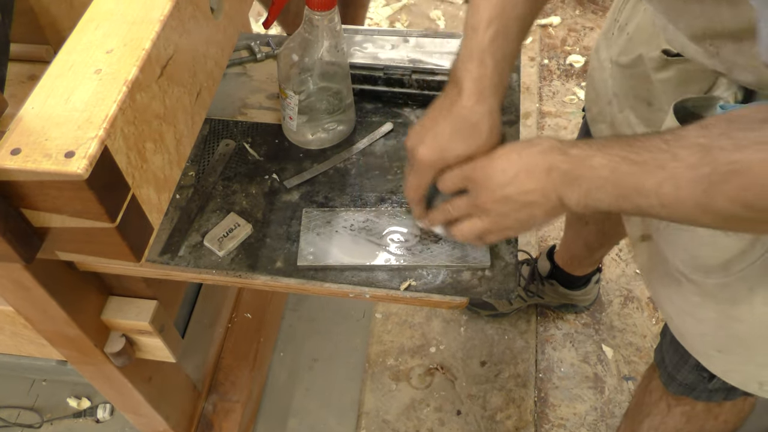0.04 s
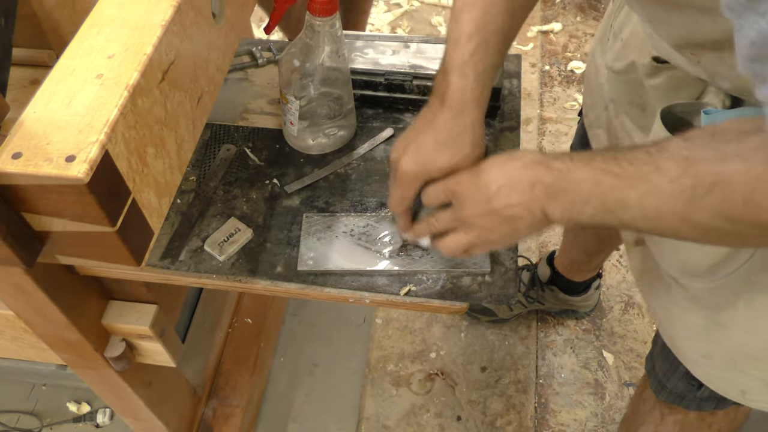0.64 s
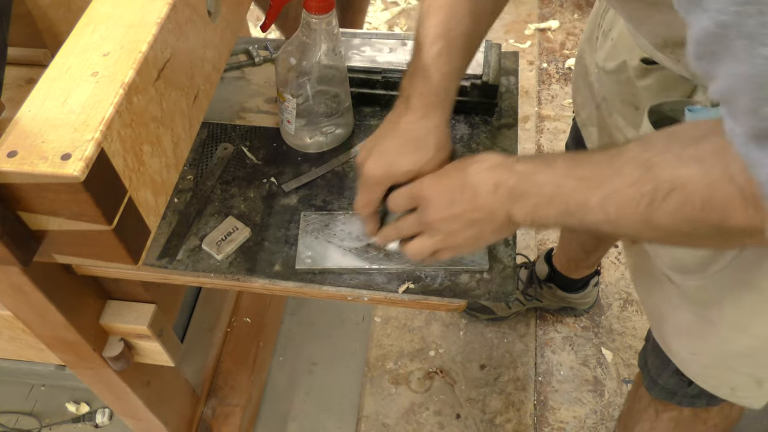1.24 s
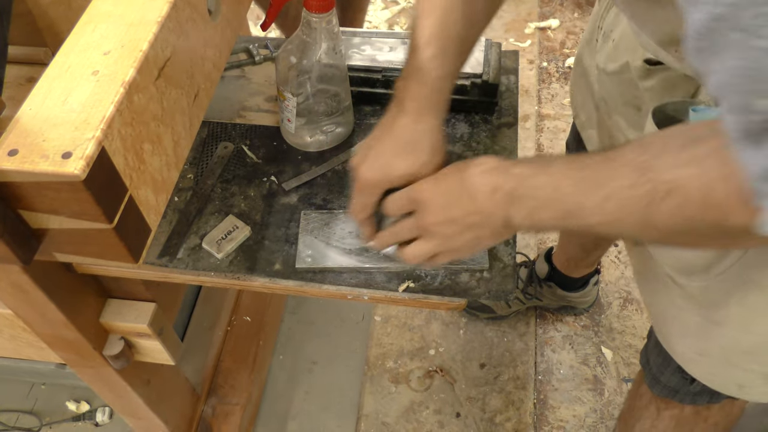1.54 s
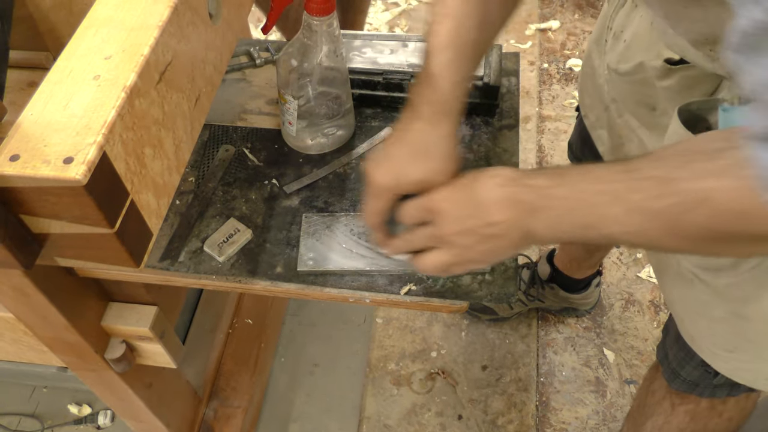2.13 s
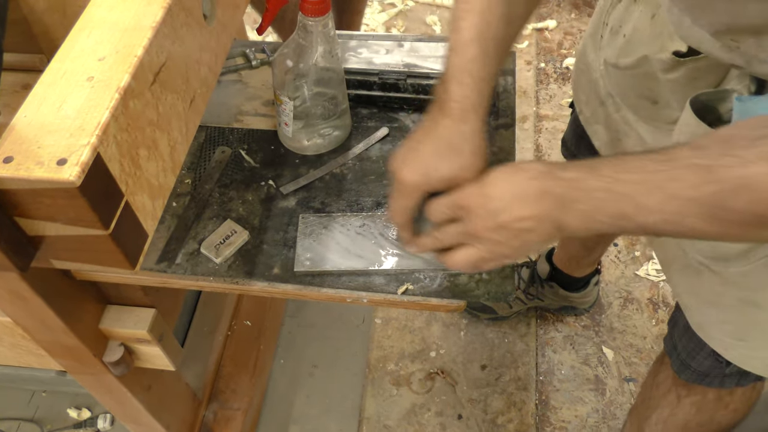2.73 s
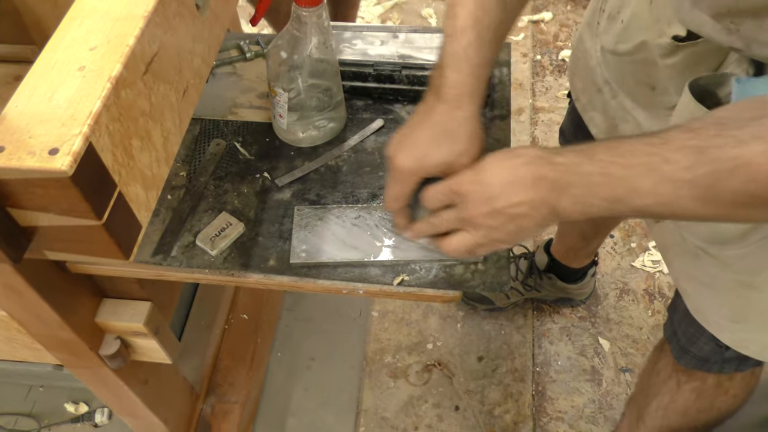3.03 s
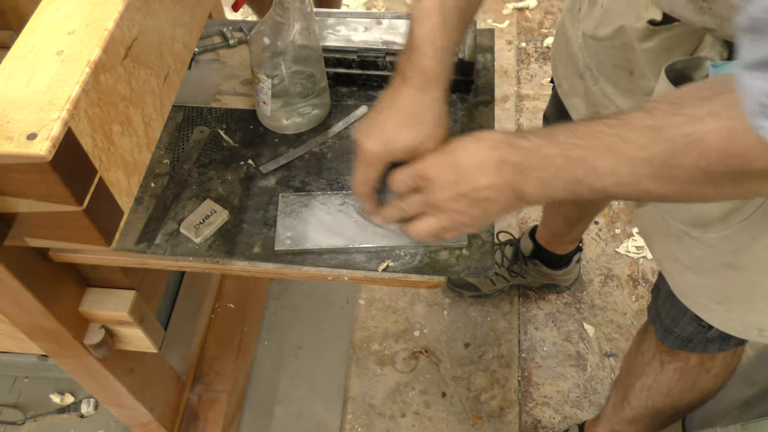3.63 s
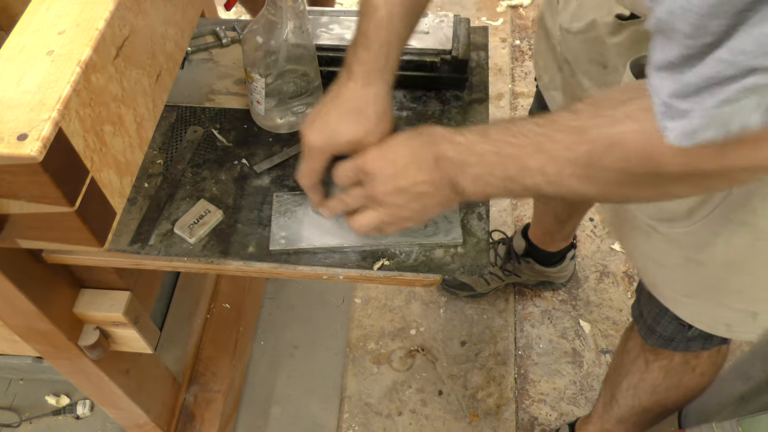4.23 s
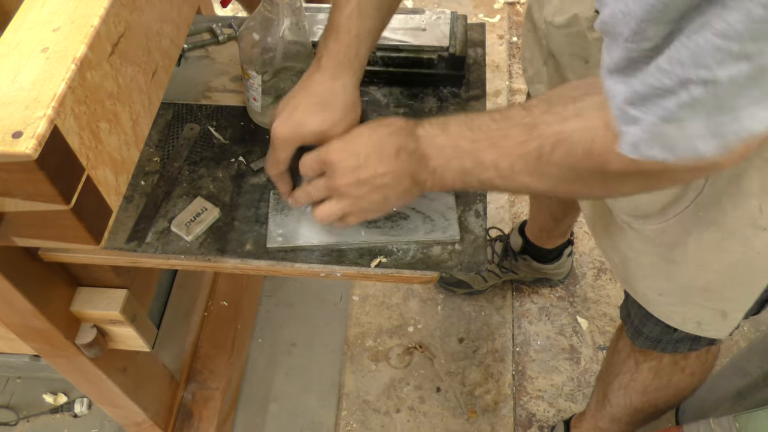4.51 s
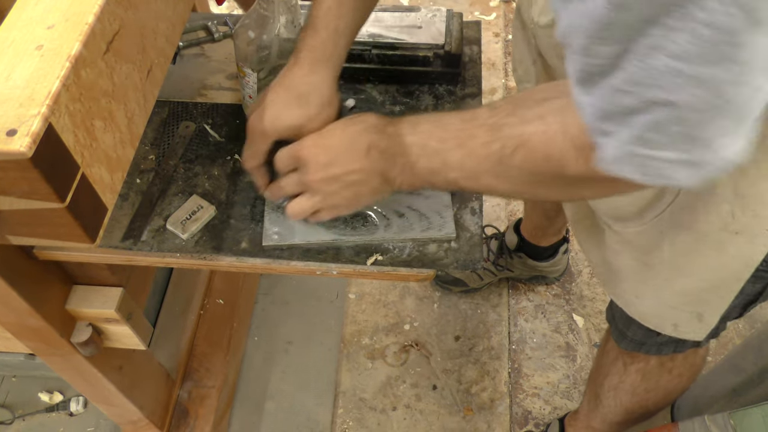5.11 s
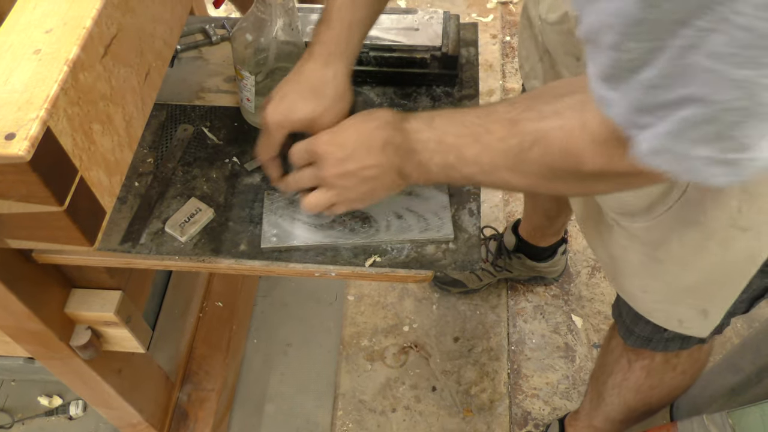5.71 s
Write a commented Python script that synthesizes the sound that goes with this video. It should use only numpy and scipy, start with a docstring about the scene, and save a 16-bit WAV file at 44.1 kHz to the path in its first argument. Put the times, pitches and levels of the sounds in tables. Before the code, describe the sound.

Close, steady scraping of steel on a wet sharpening stone pulses at roughly three strokes a second in a dry-sounding workshop. The edge catches on each pass with a tiny high squeal and ring, while wet grit swishes softly at the turns. Around the middle the steel lies flat and rasps with a slight chatter before the sharper strokes resume. Now and then it knocks lightly on the stone.

```python
"""A workshop: a steel plane part is rubbed in quick loops on a wet, coarse sharpening stone on a low bench.
Grit scratches under the steel, three loops a second; once a loop the edge bites, squeals and rings.
Midway the part lies flat and rasps. Slurry swishes at each turn, the grains rumble through the bench,
and now and then the part rocks and knocks on the stone."""
import sys
import numpy as np
from scipy import signal
from scipy.fft import rfft, irfft, next_fast_len
from scipy.io import wavfile
from scipy.ndimage import uniform_filter1d

SR = 44100
rng = np.random.default_rng(int(sys.argv[2]) if len(sys.argv) > 2 else 0)


def pcm_store(signal):
    """Save signal as 16-bit PCM."""
    levels = np.round(np.clip(np.atleast_2d(signal), -1, 1) * 32767)
    wavfile.write(sys.argv[1], SR, levels.astype(np.int16).T)


N = 262836

# grit spectra: freq_hz, gain_db
FINE_SPECTRUM = [(2500, -28.5), (4600, -6.5), (5600, -16), (6300, 6), (6850, 1.5), (7300, 3.5),
                 (7650, -0.5), (8050, -1.5), (8500, -6), (9700, -8.5), (10500, -14), (11700, -18),
                 (13700, -21), (14800, -36)]
COARSE_SPECTRUM = [(2500, -24.5), (3400, -10.5), (4200, -2), (4650, -6.5), (5200, 3.5), (5550, 2),
                   (6000, 4.5), (6400, -7), (6900, -22), (9000, -16), (11500, -35), (13000, -21),
                   (14000, -34), (14800, -56)]
RASP_SPECTRUM = [(1500, -60), (2500, -6.5), (2800, 0.5), (3350, 6.5), (3800, 7), (4500, -12.5), (5800, 0.5),
                 (6800, -46), (10000, -15), (14000, -42)]

def scratching():
    """Faster strokes meet more grains and sound brighter; the flat face adds a lower rasp."""
    fine_db, coarse_db, rasp_db = grit_drive_db()
    effort_db = fine_db - fine_db.mean()
    fine = grit(per_s=20000 * from_db(0.5 * effort_db), size_db=-0.5, judder_db=2.03, judder_hz=190)
    hiss = grit(per_s=12000, size_db=10, judder_db=-1, judder_hz=40)
    coarse = grit(per_s=12000, size_db=-0.5, judder_db=1.2, judder_hz=100)
    rasp = grit(per_s=9000, size_db=1.5, judder_db=1.9, judder_hz=17)
    hiss = signal.sosfilt(signal.butter(2, 10500, "high", fs=SR, output="sos"), hiss)
    hiss = signal.sosfilt(signal.butter(10, 13800, fs=SR, output="sos"), hiss)
    scrape = from_db(fine_db + 2) * rms_one(colour(fine, FINE_SPECTRUM))
    scrape += from_db(coarse_db + 1) * rms_one(colour(coarse, COARSE_SPECTRUM))
    scrape += from_db(rasp_db + 0.27) * rms_one(colour(rasp, RASP_SPECTRUM))
    scrape += from_db(fine_db - 21 + 0.68 * effort_db) * hiss
    return scrape * from_db(-1.8 * in_loop(share=0, spread=0.037))  # the steel slows as it swings round


def grit(per_s, size_db, judder_db, judder_hz):
    """Grains break under the steel in clumps of uneven clicks; force as (mid, side), rms 1."""
    hits = rng.random(N) < per_s / SR
    sizes = from_db(size_db * np.minimum(rng.exponential(1, N), 3.5))
    clumps = from_db(judder_db * np.clip(drift(judder_hz), -2, 2))
    return rms_one(hits * sizes * clumps * rng.standard_normal((2, N)) / np.sqrt(per_s))


def grit_drive_db():
    """Fine grit follows speed, coarse grit the push; lying flat evens the loop and drags on release."""
    flat, speed = flatness(), hand_speed()
    catch = in_loop(share=0.17, spread=0.058)
    push = in_loop(share=PUSH_SHARE, spread=0.12)
    release = in_loop(share=0.762, spread=0.092)
    contact_db = pressure_db() + (0.9 + 3.5 * flat) * catch + flat * (2.2 - 5.5 * speed)
    fine_db = -37 + contact_db + 8 * speed + release
    coarse_db = -34.5 + contact_db + 4 * speed + 4 * push + 6 * flat * release
    rasp_db = -38 + 2 * in_loop(share=0.21, spread=0.22) + flat * (3 + 4.5 * biting(spread_s=0.031))
    return fine_db, coarse_db, rasp_db


LAST_TURN_S, PUSH_SHARE, PULL_SHARE = 6.09, 0.31, 0.55
# hand loops, each a push then a pull: turn_s, push_db, pull_db, swish_gain_db, bench_load_db
HAND_LOOPS = [(-0.11, -0.5, -0.5, -40.0, 2), (0.2, 0, 1.5, -43, -1.0), (0.513, -0.5, -0.5, -41.5, 0.5),
              (0.83, -0.5, -0.5, -40.0, 0.0), (1.141, 0, -0.0, -39.0, 0), (1.45, -1, 1.5, -39, 0.5),
              (1.75, -0.5, 0.5, -39.0, -1.5), (2.061, 1, 0.0, -41.5, -0.5), (2.38, 2.0, 1, -42.5, 0),
              (2.677, -0.5, 0.5, -41.5, -0.5), (2.991, -0.5, 2.5, -47, 0.0), (3.281, -2, 3, -40.5, 1.0),
              (3.591, -0.5, 1.5, -46, -2), (3.909, 0.5, 1, -42, 0), (4.228, 0.5, 0, -39.5, 1.5),
              (4.539, 1.0, -0.5, -39.0, 2.5), (4.85, -1.5, 1, -41, -2), (5.17, -0.5, 1.5, -39.5, -1),
              (5.471, -2, 1.5, -44.0, -0.5), (5.779, -0.5, 2.0, -42, 0.5)]

def loop_count():
    """Loops completed; a whole number at each turn."""
    turns_s = [row[0] for row in HAND_LOOPS] + [LAST_TURN_S]
    return np.interp(np.arange(N) / SR, turns_s, np.arange(len(turns_s)))


def pressure_db():
    """Weight on the steel, passing from push to pull and on to the next push."""
    push_pull_db = np.array(HAND_LOOPS)[:, 1:3]
    places = np.arange(len(HAND_LOOPS))[:, None] + [PUSH_SHARE, PULL_SHARE]
    return np.interp(loop_count(), places.ravel(), push_pull_db.ravel())


def hand_speed():
    """0 at the turns, 1 halfway round."""
    return np.sin(np.pi * (loop_count() % 1))


# lie of the part: time_s, flatness (0 on its edge, 1 on its face)
LIE = [(0, 0.46), (.5, 0.36), (1.0, 0), (2.1, 0.09), (2.5, 0.74), (2.9, 0.94), (3.45, 1.0), (3.8, 0.65),
       (4.1, 0.69), (4.5, 0), (5.6, 0), (5.96, 0.051)]

def flatness():
    """How flat the part lies on the stone."""
    return in_time(LIE)[0]


# edge bites, as push gives way to pull: centre_s, length_s, squeal_db, ring_gain_db
EDGE_BITES = [(0.077, 0.074, -28, -31), (0.399, .05, -23.5, -29.5), (.699, .05, -28, -29),
              (1.017, .07, -24.5, -31), (1.324, .08, -22.5, -30), (1.634, 0.13, -25.5, -30.5),
              (1.946, .055, -20.5, -25.5), (2.255, 0.12, -24, -25.5), (2.567, .07, -29, -31.5),
              (2.873, .07, -45, -44), (3.178, .07, -44, -45), (3.488, 0.067, -37, -27),
              (3.79, .07, -34, -26.5), (4.111, 0.051, -26.5, -38), (4.42, 0.09, -26.5, -31),
              (4.725, .07, -31, -32.5), (5.037, 0.1, -26.5, -35), (5.34, 0.051, -24, -32),
              (5.658, .07, -30, -28.5), (5.95, .06, -28.5, -29)]
# chatter of the face: centre_s, length_s, pitch_hz, level_db, glide_hz_per_s
CHATTER = [(2.039, 0.13, 5850, -31, -2000), (2.879, 0.1, 3270, -31.5, 3500), (2.89, 0.085, 5960, -34, 0),
           (2.98, 0.13, 5720, -30, 0), (3.073, 0.089, 3910, -34, 0), (3.167, 0.12, 3227, -30, 4000),
           (3.285, 0.06, 5780, -30, 0), (3.434, 0.086, 3900, -28, 0), (3.515, 0.11, 5860, -29, 0),
           (3.838, 0.053, 6230, -27, 0), (3.865, 0.051, 5930, -37, 0), (4.945, 0.21, 3450, -38, 0),
           (5.274, 0.057, 3450, -36, 0)]

def squeals(bite_hz, bite_glide_hz_per_s, width_hz, judder_db):
    """Stick and slip of the steel: brief, rough tones that swell and die."""
    out, time_s = np.zeros((2, N)), np.arange(N) / SR
    # the swing builds and collapses at random; the grip holds its mean strength
    swing = np.array([drift(width_hz) + 1j * drift(width_hz) for _ in range(2)])
    swing *= from_db(judder_db * drift(150))
    swing /= np.sqrt(uniform_filter1d(np.abs(swing) ** 2, size=1100) / 2 + 1e-6)
    bites = [(s, length_s, bite_hz, db, bite_glide_hz_per_s) for s, length_s, db, _ in EDGE_BITES]
    for centre_s, length_s, pitch_hz, level_db, glide_hz_per_s in bites + CHATTER:
        span = np.flatnonzero(np.abs(time_s - centre_s) < length_s / 2)
        t = time_s[span] - centre_s
        tone = np.exp(2j * np.pi * (pitch_hz * t + glide_hz_per_s * t ** 2 / 2))
        out[:, span] += from_db(level_db) * np.cos(np.pi * t / length_s) * (swing[:, span] * tone).real
    return out


def biting(spread_s, lead_s=0):
    """A swell round each bite of the edge."""
    time_s = np.arange(N) / SR
    return sum(bell(time_s - row[0] + lead_s, spread_s) for row in EDGE_BITES)


# slow fade of the low steel mode: time_s, gain_db
LOW_MODE_FADE = [(0, .4), (2.6, 0.2), (4.4, -0.9), (5.96, -2)]

def steel_ring():
    """Two modes of the part; their pitch rises with stroke speed and sags when the flat face bites."""
    flat, speed = flatness(), hand_speed()
    bite = biting(spread_s=0.03, lead_s=-0.0054)
    fade_db, = in_time(LOW_MODE_FADE)
    low_db = -41.5 + fade_db + 2.5 * speed + 6.5 * bite
    low_db += 3 * in_loop(share=0.21, spread=0.11) - in_loop(share=0, spread=0.17) - 0.53
    low_hz = 1962 + 126 * speed - 98 * flat * bite
    low = steel_mode(low_db, low_hz, width_hz=145, wander=0.014, judder_db=3.5, judder_hz=14)
    _, _, ring_gain_db = in_time(EDGE_BITES)
    bitten = from_db(ring_gain_db) * biting(spread_s=0.022)
    rubbed = from_db(-47 + 8.5 * speed + 8.5 * flat * in_loop(share=0.34, spread=0.18))
    plate_db = 20 * np.log10(np.hypot(bitten, rubbed)) - 0.51
    stiffening_hz = 60 * (1 - flat) * bite
    plate_hz = 3870 * (low_hz / low_hz.mean()) ** 0.96 + stiffening_hz
    return low + steel_mode(plate_db, plate_hz, width_hz=165, wander=0.006, judder_db=2.5, judder_hz=52)


def steel_mode(level_db, pitch_hz, width_hz, wander, judder_db, judder_hz):
    """Grit drives a mode in fits; the shifting grip bends its pitch and friction holds its swing."""
    force = grit(per_s=12000, size_db=2, judder_db=judder_db, judder_hz=judder_hz)
    swing = resonate(force, pitch_hz * (1 + wander * drift(42)), width_hz)
    running_rms = np.sqrt(uniform_filter1d(swing[0] ** 2, size=1800) + 1e-6)
    return from_db(level_db) * swing / running_rms


# wet hiss: freq_hz, gain_db
SLURRY_SPECTRUM = [(300, -14), (650, -9.5), (1100, 0.5), (1350, 0), (1600, 9.5), (1850, 10.5), (2400, 0),
                   (4000, 4), (9000, -51)]

def slurry_swish(centre_hz, fall_octaves_per_loop, width_hz):
    """At each turn the steel squeezes wet grit aside: a hollow, falling swish over a thin hiss."""
    _, _, swish_gain_db, _ = in_time(HAND_LOOPS)
    swell = in_loop(share=0, spread=0.12)
    force = grit(per_s=3200, size_db=2, judder_db=1.6, judder_hz=17)
    octaves = -fall_octaves_per_loop * loop_offset(share=0) + 0.097 * drift(2.2)
    hollow = resonate(force, centre_hz * 2 ** octaves, width_hz)
    wet_grains = grit(per_s=4000, size_db=2, judder_db=3.5, judder_hz=22)
    hiss = rms_one(colour(wet_grains, SLURRY_SPECTRUM))
    return from_db(swish_gain_db - 0.8) * swell * hollow + from_db(-44.5 + 4.4 * swell) * hiss


# bench response: freq_hz, gain_db
BENCH_SPECTRUM = [(50, -34), (110, -32), (160, -5.5), (235, 8), (292, -3), (330, 1.5), (385, 2.5), (450, 5),
                  (560, -2.5), (690, 7), (830, -4), (920, 0), (1500, -6.5), (3000, -41)]

def bench_rumble():
    """Grains rumble through the stone into the bench, loaded at the turn, the push and before the bite."""
    load_db = np.interp(loop_count(), np.arange(len(HAND_LOOPS)) + 0.5, np.array(HAND_LOOPS)[:, 4])
    load_db += 6.5 * in_loop(share=0.02, spread=0.092)
    load_db += 6.5 * in_loop(share=0.36, spread=0.086)
    load_db += 10 * biting(spread_s=0.02, lead_s=0.011)
    force = grit(per_s=2200, size_db=0.8, judder_db=1.5, judder_hz=32)
    return from_db(-53 + 2.1 * flatness() + load_db) * rms_one(colour(force, BENCH_SPECTRUM))


# knocks on the stone: start_s, strength_db
ROCKINGS = [(1.866, -33), (2.146, -34), (2.465, -34), (2.773, -29.5), (3.677, -27.5), (4.402, -36),
            (4.63, -26)]
# modes of stone and bench: pitch_hz, gain_db, t60_s
STRUCK_MODES = [(242, -42, 0.046), (477, -2, .03), (726, -4.5, 0.074), (880, -12, 0.015), (1150, 3, 0.014),
                (1450, 6.5, 0.019), (2020, 8.5, 0.019)]

def knocks():
    """The part rocks onto the stone and strikes each mode with a strength of its own."""
    start_s, strength_db = np.transpose(ROCKINGS)
    starts = np.round(start_s * SR).astype(int)
    scatter_db = 0.7 * rng.standard_normal((len(starts), len(STRUCK_MODES)))
    mid = np.zeros(N)
    for k, (pitch_hz, gain_db, t60_s) in enumerate(STRUCK_MODES):
        clicks = np.zeros(N)
        clicks[starts] = from_db(strength_db + gain_db - 3 + scatter_db[:, k])
        mid += (-1) ** k * ring(clicks, pitch_hz, t60_s)
    return np.array([mid, np.zeros(N)])


def moving_echoes(x, echo_db, paths=7):
    """Hands, arms and bench reflect the treble along paths that move with each loop: its colour swirls."""
    t, loop_rad = np.arange(N) / SR, 2 * np.pi * loop_count()
    treble = colour(x, [(1500, -40), (2800, 0)])
    oversampled = signal.resample_poly(treble, 4, 1, axis=1)
    echoes = np.zeros((2, N))
    for channel in range(2):
        for path_s in np.linspace(0.0006, 0.0046, paths) + rng.uniform(-0.0002, 0.0002, paths):
            sway_s = 0.00011 * np.sin(loop_rad + rng.uniform(0, 2 * np.pi))
            lag_s = path_s + sway_s + 0.00014 * drift(0.7)
            read = np.clip(np.round((t - lag_s) * 4 * SR).astype(int), 0, 4 * N - 1)
            polarity = rng.choice([-1, 1])
            echoes[channel] += polarity * (t > lag_s) * oversampled[channel, read] / np.sqrt(paths)
    gain = from_db(echo_db)
    return x - treble + (treble + gain * echoes) / np.sqrt(1 + gain ** 2)


def workshop_reverb(x, t60_s, wet_db):
    """Walls and timber add a short, dense tail."""
    t = np.arange(SR // 2) / SR
    tail = rng.standard_normal((2, len(t))) * from_db(-60 * t / t60_s) * (t > 0.004)
    tail /= np.sqrt(np.sum(tail ** 2, axis=1, keepdims=True))
    return x + from_db(wet_db) * signal.fftconvolve(x, tail, axes=1)[:, :N]


# room tone: freq_hz, gain_db
AIR_SPECTRUM = [(15, 14.5), (35, -13), (75, -31), (130, -8), (500, -3), (4000, -18)]

def still_air(level_db):
    """Faint, steady noise of the workshop air."""
    return from_db(level_db) * rms_one(colour(rng.standard_normal((2, N)), AIR_SPECTRUM))


# stereo width: freq_hz, side_gain_db
SIDE_RESPONSE = [(30, -1), (70, -6), (150, -20), (900, -29.5), (1700, -29), (2200, -15), (4000, -12),
                 (6300, -13), (7700, -5), (9000, 0.5), (10800, 4), (13000, -0.5), (15000, -6)]
# stereo tilt: freq_hz, left_gain_db
LEFT_RESPONSE = [(60, 0.5), (120, 0), (500, -.5), (900, -0.6), (1700, 0), (2700, -0.2), (4200, 1.5),
                 (6400, .5), (10000, 0.85), (14000, 1.5)]

def microphone_pair(mid, side):
    """Mid and side to left and right; sound reaches the right port a fraction of a sample earlier."""
    side = colour(side, SIDE_RESPONSE) - 0.14 * np.gradient(mid)
    return np.array([colour(mid + side, LEFT_RESPONSE), mid - side])


def loop_offset(share):
    """Signed distance, in loops, from the nearest pass through a place in the loop."""
    return (loop_count() - share + 0.5) % 1 - 0.5


def in_loop(share, spread):
    """A swell at the same place in every loop; share 0 is the turn."""
    return bell(loop_offset(share), spread)


def bell(offset, spread):
    """A smooth swell, 1 at offset 0."""
    return np.exp(-0.5 * (offset / spread) ** 2)


def resonate(force, pitch_hz, width_hz):
    """A steep-skirted mode whose centre follows a pitch curve; rms 1."""
    carrier = np.exp(2j * np.pi * np.cumsum(pitch_hz) / SR)
    swing = force / carrier
    for stage_hz in (width_hz, 4 * width_hz):
        pole = np.exp(-np.pi * stage_hz / SR)
        swing = signal.lfilter([1 - pole], [1, -pole], swing)
    return rms_one((swing * carrier).real)


def ring(clicks, pitch_hz, t60_s):
    """A unit click starts a decaying sine of height 1."""
    pole, step_rad = from_db(-60 / (t60_s * SR)), 2 * np.pi * pitch_hz / SR
    feedback = [1, -2 * pole * np.cos(step_rad), pole * pole]
    return signal.lfilter([0, np.sin(step_rad)], feedback, clicks + 1e-18)


def drift(rate_hz):
    """Smooth random curve of rms 1, rolled off above rate_hz."""
    step, size = 16, 2 ** 15
    bins_hz = np.fft.rfftfreq(size, step / SR)
    spectrum = rfft(rng.standard_normal(size)) / (1 + (bins_hz / rate_hz) ** 2)
    return rms_one(np.interp(np.arange(N) / step, np.arange(size), irfft(spectrum)))


def colour(x, outline):
    """Filter by rows of freq_hz, gain_db."""
    size = next_fast_len(N + 4096)
    freq_hz, gain_db = np.transpose(outline)
    bins_hz = np.maximum(np.fft.rfftfreq(size, 1 / SR), 1)
    gain = from_db(np.interp(np.log(bins_hz), np.log(freq_hz), gain_db))
    return irfft(rfft(x, size) * gain, size)[..., :N]


def in_time(rows):
    """Each column after the leading time_s, at every sample."""
    time_s, *columns = np.transpose(rows)
    return [np.interp(np.arange(N) / SR, time_s, column) for column in columns]


def from_db(db):
    """Decibels to gain."""
    return np.exp(np.asarray(db) * (np.log(10) / 20))


def rms_one(x):
    """Scale to rms 1."""
    return x / np.sqrt(np.mean(x ** 2) + 1e-20)


def scene():
    """The rubbing in the room, at a close pair of microphones."""
    work = moving_echoes(scratching(), echo_db=-5)
    work += slurry_swish(centre_hz=990, fall_octaves_per_loop=2.05, width_hz=450)
    work += steel_ring()
    work += squeals(bite_hz=6350, bite_glide_hz_per_s=1460, width_hz=140, judder_db=-2.7)
    work += bench_rumble() + knocks()
    air = still_air(level_db=-57)
    mid, side = workshop_reverb(work, t60_s=0.11, wet_db=-12) + air
    return microphone_pair(mid, side) * from_db(0.03)


def record(dry):
    """Steep low-pass, 60 dB down at 15.7 kHz."""
    return signal.sosfilt(signal.cheby2(14, 60, 15700, fs=SR, output="sos"), dry)


dry = scene()
out = record(dry)
pcm_store(out)
```